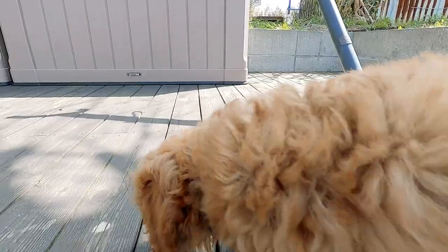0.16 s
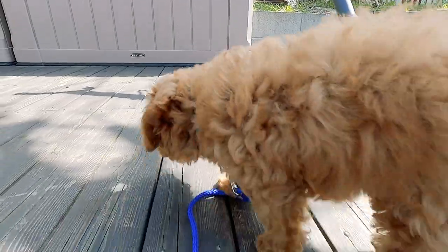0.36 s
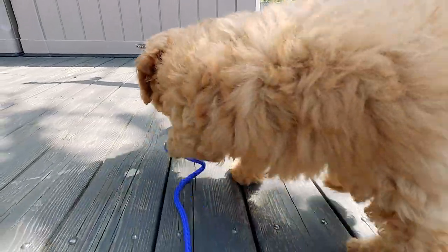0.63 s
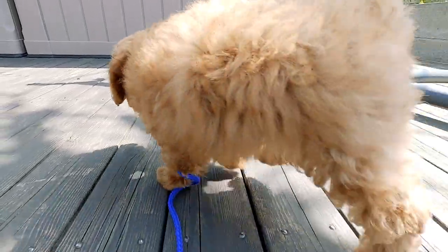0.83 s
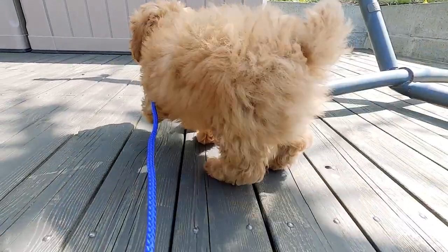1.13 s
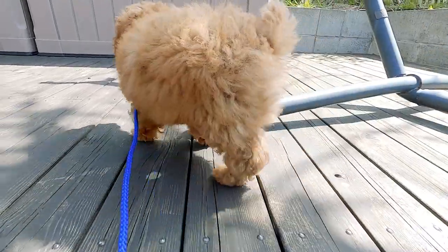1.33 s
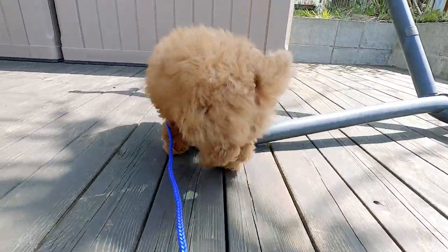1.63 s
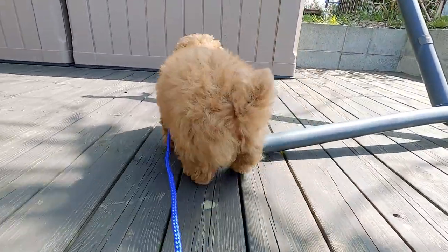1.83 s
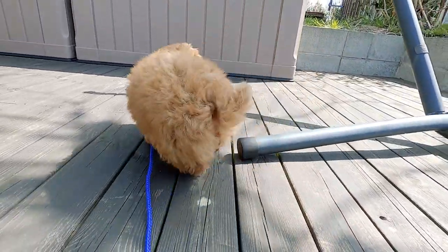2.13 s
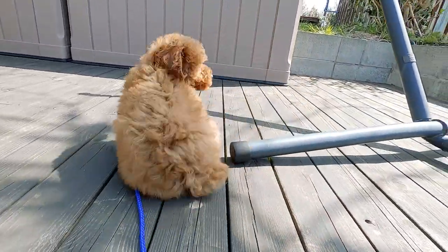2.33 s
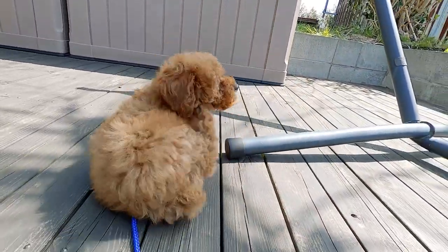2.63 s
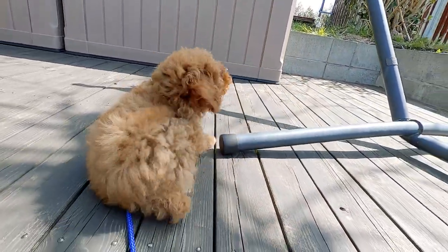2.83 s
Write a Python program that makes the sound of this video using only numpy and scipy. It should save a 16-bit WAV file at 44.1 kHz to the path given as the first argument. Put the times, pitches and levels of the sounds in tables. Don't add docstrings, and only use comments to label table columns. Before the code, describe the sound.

Puppy claws tick and skid lightly on a wooden deck, with fur rustle and low wind rumble

```python
import sys
import numpy as np
from scipy import signal
from scipy.fft import rfft, irfft
from scipy.io import wavfile
from scipy.ndimage import uniform_filter1d

SR = 44100
rng = np.random.default_rng(int(sys.argv[2]) if len(sys.argv) > 2 else 0)


def volts(x):
    e = np.asarray(x, float) / 20
    return 10 ** e


def transcribe(u):
    v = np.clip(np.atleast_2d(u).T, -1, 1)
    q = np.round(v * 32767).astype(np.int16)
    wavfile.write(sys.argv[1], SR, q)


N = 131418


def band(x, hz, width):
    hz = min(hz, 0.33 * SR)
    width_hz = np.clip(width * hz, 1, SR / 3)
    return signal.lfilter(*signal.iirpeak(hz, hz / width_hz, SR), x)


def level(x, rms_db):
    return x * volts(rms_db) / np.sqrt(np.mean(x ** 2))


def add(out, start_s, x):
    i = int(start_s * SR)
    out[i:i + len(x)] += x[:max(N - i, 0)]


def walk(rate_hz):
    hold = int(SR / rate_hz)
    steps = np.repeat(rng.standard_normal(N // hold + 1), hold)
    return 1.27 * uniform_filter1d(uniform_filter1d(steps, hold), hold)[:N]


def coloured(points):
    point_hz, point_db = np.array(points, float).T
    hz = np.arange(N // 2 + 1) * SR / N + 1e-3
    gain = volts(np.interp(np.log(hz), np.log(point_hz), point_db))
    return irfft(rfft(rng.standard_normal(N)) * gain, N)


def strength(points):
    point_s, point_db = np.array(points).T
    return volts(np.interp(np.arange(N) / SR, point_s, point_db))


def grains(chance, per_s, spread_db):
    fires = chance[0] < per_s / SR
    size = volts(-spread_db * np.log(chance[2] + 1e-4))
    return fires * np.sign(chance[1] - 0.5) * size


def flicker():
    return volts(0.6 * walk(2) + 0.6 * walk(11))


def traffic():
    # pitch_hz, density_db
    spectrum = [(60, -37), (100, -1.5), (690, -15.5), (1550, -23.5), (2600, -30.5), (16000, -46.5)]
    drone = level(band(rng.standard_normal(N), 312.5, 0.061), -56)
    return level(coloured(spectrum), -40) * flicker() + drone


def leaves():
    # pitch_hz, level_db
    spectrum = [(500, -16), (2000, -3.5), (4000, -5), (10000, 1.5), (16000, -2)]
    # time_s, level_db
    breeze = [(0, -1), (.6, 0.5), (.85, 1), (1.22, 1.5), (1.6, 3), (2.05, 2.5), (2.3, 4.5), (2.7, 5),
              (2.98, 9.5)]
    return level(coloured(spectrum), -52.5) * strength(breeze) * flicker()


def wind():
    # pitch_hz, level_db
    spectrum = [(10, -3), (22, -1), (36, 4), (52, -7), (70, -9.5), (92, -7), (120, -25), (500, -56)]
    # time_s, level_db
    gusts = [(0, -23.5), (.29, -25.5), (.33, -21.5), (.47, -28.5), (.57, -25), (.75, -22), (1.25, -25),
             (1.6, -22.5), (1.85, -26), (1.95, -24), (2.08, -27), (2.33, -26.5), (2.46, -21), (2.55, -24.5),
             (2.85, -22), (2.98, -24.5)]
    return level(coloured(spectrum), 0) * strength(gusts)


def clip():
    # start_s, peak_db
    jingles = [
        (1.107, -31.5),
        (1.1193, -31),
        (1.1353, -25),
        (1.1468, -24.5),
        (1.155, -39),
        (1.171, -37),
        (1.1894, -40),
    ]
    # pitch_hz, level_db, t60_s
    modes = [(6150, -16, 0.06), (7500, -13, 0.021), (9200, -10, .015), (9900, 2, 0.022),
             (10280, -1.5, 0.04), (11300, -15, .012)]
    out, t = np.zeros(N), np.arange(5000) / SR
    for start_s, peak_db in jingles:
        noise = rng.standard_normal(len(t))
        rattle = noise * np.exp(-t / 0.0047)
        y = np.zeros(len(t))
        for (hz, mode_db, t60_s), vary in zip(modes, rng.standard_normal(len(modes))):
            width = np.log(1000) / (np.pi * t60_s * hz)
            ring = band(rattle, hz * (1 + 0.0036 * vary), width)
            y += volts(mode_db + 1.5 * vary) * np.sqrt(t60_s) * ring
        add(out, start_s, y * volts(peak_db - 3) / np.abs(y).max())
    return out


def knocks():
    # start_s, peak_db, ring_hz, t60_s
    pushes = [(.2335, -30.5, 2000, .02), (.234, -38, 4100, 0.0093), (0.39, -39.5, 2020, 0.017),
              (.769, -34, 900, 0.027), (.769, -35, 670, 0.017), (0.59, -41, 1900, 0.013),
              (.234, -32, 580, .02), (0.9, -33.5, 1100, 0.014), (1.005, -33.5, 890, 0.037),
              (1.011, -29.5, 276, 0.15), (1.004, -25, 144, 0.17), (1.124, -40, 3270, 0.013),
              (1.146, -37.5, 3160, 0.023), (1.541, -39.5, 1930, 0.048), (1.702, -39, 1700, 0.027),
              (2.191, -27.5, 1610, 0.021), (2.198, -36, 1100, 0.028), (.512, -41.5, 4400, 0.053),
              (.479, -38, 4900, .03), (.47, -33.5, 160, 0.25), (.55, -34, 205, 0.16), (1.137, -38, 6030, .11),
              (1.14, -37, 7480, .06), (1.106, -41, 7000, .03), (.771, -30, 6050, 0.026),
              (2.679, -37.5, 1560, 0.039)]
    out, t = np.zeros(N), np.arange(5000) / SR
    for start_s, peak_db, hz, t60_s in pushes:
        noise = rng.standard_normal(len(t))
        rough = band(band(noise, 1.3 * hz, 0.72), 1.3 * hz, 0.8)
        y = np.sin(2 * np.pi * hz * t) + volts(-9.5) * level(rough, 0)
        push = np.minimum(t * hz / 0.92, 1)
        add(out, start_s, y * volts(peak_db - 60 * t / t60_s) * push)
    return out


def brushes():
    # start_s, length_s, rms_db, centre_hz, width_share
    strokes = [(0.134, 0.02, -44.5, 8000, 0.69), (0.294, 0.023, -46.5, 9200, .4),
               (0.309, 0.031, -43.5, 6100, 1.6), (0.36, 0.043, -48, 5100, 0.87),
               (0.426, 0.027, -45, 9000, 1.1), (0.495, 0.038, -45, 7040, 1.6),
               (0.633, 0.052, -40, 11100, 0.6), (.654, .066, -35, 9000, 1.2),
               (0.656, .035, -37, 11000, .15), (.658, .04, -36, 9200, .15), (.672, .04, -44.5, 5500, .25),
               (.658, .02, -43, 4500, .4), (.68, .14, -49, 900, 1), (2.5, .48, -53, 700, .6),
               (0.7, 0.052, -39.5, 10000, 1.3), (0.735, 0.033, -36, 12200, 0.46),
               (0.737, 0.038, -37, 6100, 1.5), (0.764, 0.042, -40.5, 6700, 1.24),
               (0.91, 0.034, -42.5, 9000, 1.3), (1.009, 0.078, -43.5, 8000, 1.3),
               (1.095, 0.12, -45, 10500, .7), (1.286, 0.14, -37.5, 9200, 0.75),
               (1.291, 0.12, -39.5, 3600, 1.2), (1.351, 0.19, -45.5, 9100, 0.97),
               (1.33, 0.29, -48, 2930, 0.82), (1.448, 0.38, -50, 8800, 0.84),
               (1.8, 0.14, -48.5, 5070, 0.32), (1.801, 0.18, -39.5, 10700, 0.56),
               (1.901, .07, -40, 11800, 0.45), (1.94, 0.053, -39, 11200, 0.55),
               (2.033, .022, -41, 9900, .12), (.884, .014, -48, 5200, .8), (2.101, 0.27, -52, 8100, 0.69),
               (2.292, 0.27, -46.5, 8400, 0.88), (2.386, 0.061, -46, 3000, 1.4),
               (2.441, 0.19, -41.5, 9400, 1.8), (2.56, 0.18, -44, 7950, 1.5), (2.64, 0.07, -42, 9300, 0.68),
               (2.754, 0.061, -42.5, 4970, 1.45), (2.827, 0.18, -47.5, 10200, 0.58),
               (2.931, 0.11, -36.5, 10300, 0.75)]
    attack_share, patch_width, patch_db = 0.36, 0.07, -10
    out = np.zeros(N)
    rub = grains(rng.random((3, N)), per_s=4200, spread_db=2)
    rub = level(rub, 0) * volts(1.2 * walk(90)) + volts(3) * rng.standard_normal(N)
    swing = volts(4 * walk(41.3))
    for start_s, length_s, rms_db, hz, width in strokes:
        u = np.arange(int(length_s * SR)) / (length_s * SR)
        rise, fall = u / attack_share, (1 - u) / (1 - attack_share)
        shape = np.clip(np.minimum(rise, fall), 0, 1) ** 0.8
        stroke = np.roll(rub, -int(rng.random() * N))[:len(u)]
        broad = band(band(stroke, hz, width), hz, 1.9 * width)
        patches = np.zeros(len(u))
        for k, place in enumerate(rng.random(6)):
            patch_hz = hz * np.exp(width * (k + place - 3.3) / 4.87)
            patch_swing = np.roll(swing, int(place * N))[:len(u)]
            patches += band(broad, patch_hz, patch_width) * patch_swing
        add(out, start_s, level(level(broad, 0) + level(patches, patch_db), rms_db) * shape)
    return out


def ticks(table, per_s, fade, first, crack_db=-1, overtone_db=-7.5):
    start_delay_s, tail_db, tail_t60_s = 0.0009, -16, 0.025
    ring_width, overtone_ratio = 0.19, 1.41
    crack_band = signal.butter(2, [2000, 13500], "band", fs=SR, output="sos")
    out, t = np.zeros(N), np.arange(3000) / SR
    for start_s, peak_db, hz, skid_s in table:
        chance = rng.random((4, len(t)))
        skid_s = max(skid_s, 0.0002)
        x = grains(chance, per_s, 1.27) * np.exp(-fade * t / skid_s) / (1 + (t / skid_s) ** 8)
        x[0] += first
        x = x + volts(tail_db) * (chance[3] - 0.5) * volts(-60 * t / tail_t60_s)
        crack = signal.sosfilt(crack_band, x)
        ring = band(band(x, hz, ring_width), hz, 0.44)
        overtone = band(x, overtone_ratio * hz, ring_width)
        rings = ring + volts(overtone_db) * overtone
        crack_gain = volts(crack_db - 0.5 * (peak_db + 17))
        y = crack_gain * level(crack, 0) + level(rings, 0)
        add(out, start_s + start_delay_s, y * volts(peak_db) / np.abs(y).max())
    return out


def grit():
    # start_s, peak_db, ring_hz, skid_s
    scrapes = [(0.2952, -43, 7350, 0.006), (0.4284, -38, 8080, 0.006), (0.7437, -35, 5960, 0.0053),
               (0.999, -34, 8130, 0.004), (1.0574, -32, 11300, 0.0057), (1.5364, -35, 3890, 0.011),
               (2.253, -34.5, 4940, 0.0059), (2.6557, -29, 10500, 0.0054)]
    return ticks(scrapes, per_s=8950, fade=0.28, first=0.45)


def skids():
    # start_s, peak_db, ring_hz, skid_s
    slides = [(.1695, -38, 7000, 0.0064), (.702, -29, 11000, 0.002), (.772, -22.5, 9050, 0.004),
              (.954, -30, 7700, 0.012), (1.0065, -28.5, 6070, 0.0056), (2.239, -26, 7500, 0.0037),
              (2.689, -28.5, 9000, 0.0038)]
    return ticks(slides, per_s=12000, fade=-0.1, first=0.3)


def pings():
    # start_s, peak_db, ring_hz, skid_s
    spots = [(.384, -35, 6490, 0.0037), (.48, -34, 4900, .003), (.481, -33.5, 8900, 0.0035),
             (.5165, -37, 8000, .004), (.7035, -18, 11300, 0.0045), (.704, -21, 7000, 0.0043),
             (.766, -23, 6100, 0.0026), (.769, -18, 9200, 0.0017), (.7774, -29, 3270, .006),
             (.8748, -35.5, 5540, .0022), (.9094, -22, 3800, .0026), (.9094, -29, 11800, 0.0014),
             (.9105, -26, 7000, 0.0019), (.954, -31, 9600, 0.0023), (.956, -42, 3620, .007),
             (1.0075, -31, 3300, .005), (1.698, -39, 11600, 0.0022), (1.7666, -32, 6000, .003),
             (1.8025, -30.5, 9100, 0.0032), (1.8025, -35, 5400, .003), (1.812, -38, 5000, .004),
             (1.9326, -34, 12000, .004), (2.6653, -23.5, 10000, .0025), (2.682, -23.5, 9300, .004),
             (2.682, -30, 6740, .004), (2.9244, -30, 11000, .005), (2.9364, -34, 10800, .005),
             (2.948, -29, 10800, 0.0033), (.176, -23, 11900, .002), (2.2344, -33, 10800, .002),
             (2.415, -33, 7600, 0.0056), (2.5571, -27.5, 7900, 0.0016), (2.578, -32, 10500, 0.0018)]
    return ticks(spots, per_s=12000, fade=0.7, first=0.83, crack_db=-18, overtone_db=-22)


def snaps():
    # start_s, peak_db, ring_hz, skid_s
    nails = [
        (.176, -26, 6000, 0.00054),
        (.7063, -21, 11300, 0.00051),
        (1.0057, -17, 8340, 0.00029),
    ]
    return ticks(nails, per_s=12000, fade=0.7, first=4.6)


def claws():
    # start_s, peak_db, ring_hz, skid_s
    strikes = [
        (0.1346, -34, 4690, 0.002),
        (0.7687, -15.5, 6340, 0.0016),
        (0.9094, -23.5, 7300, 0.0027),
        (1.6979, -24, 5530, 0.0032),
        (1.7035, -21, 6800, 0.0023),
        (2.683, -29, 9000, 0.0019),
        (2.7644, -35, 3150, 0.004),
        (2.948, -34, 6700, 0.0035),
        (2.9744, -23.5, 10600, 0.0028),
    ]
    return ticks(strikes, per_s=12000, fade=0.27, first=1.2)


def scene():
    background = traffic() + leaves() + wind()
    claw_sounds = grit() + skids() + pings() + snaps() + claws()
    return (background + clip() + knocks() + brushes() + claw_sounds)[None]


def top_cut(x):
    return signal.sosfilt(signal.butter(12, 16460, fs=SR, output="sos"), x)


def record(dry):
    mic_hz, top_hz = 13000, 15650
    x = signal.sosfilt(signal.butter(1, mic_hz, fs=SR, output="sos"), dry)
    mix = signal.sosfilt(signal.ellip(10, 0.2, 70, top_hz, fs=SR, output="sos"), x)
    return top_cut(mix)


dry = scene()
out = record(dry)
transcribe(out)
```